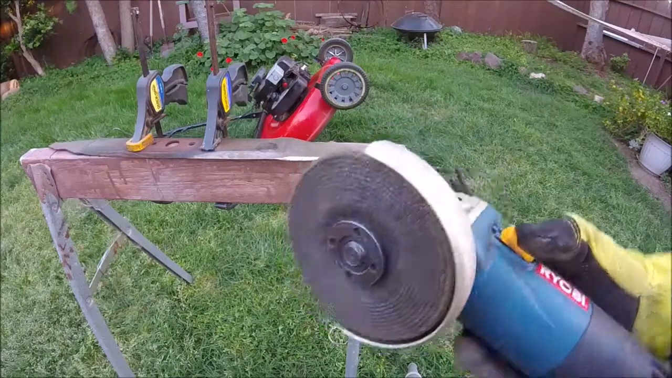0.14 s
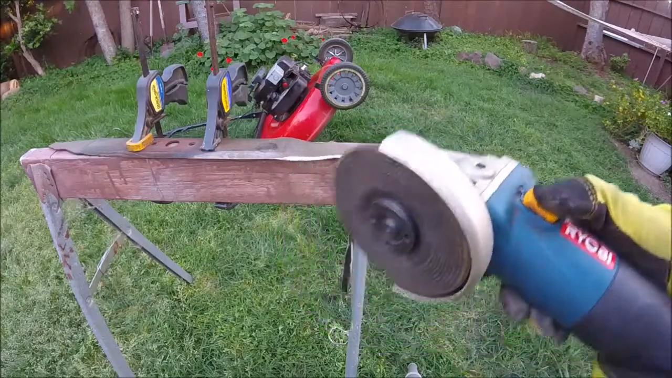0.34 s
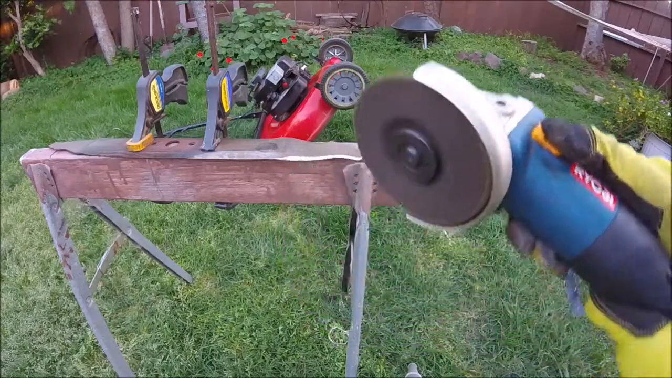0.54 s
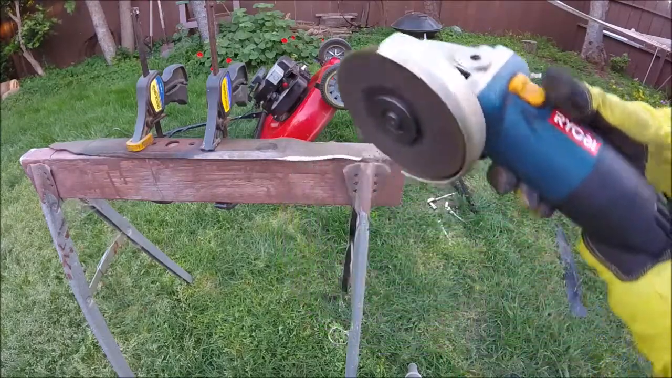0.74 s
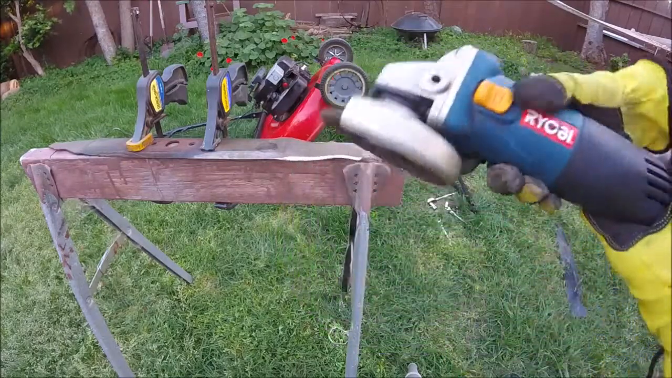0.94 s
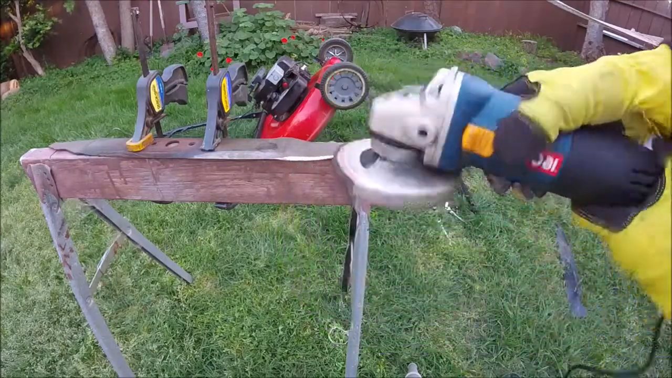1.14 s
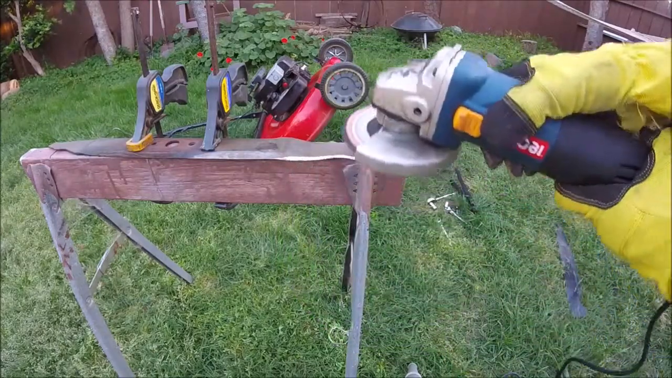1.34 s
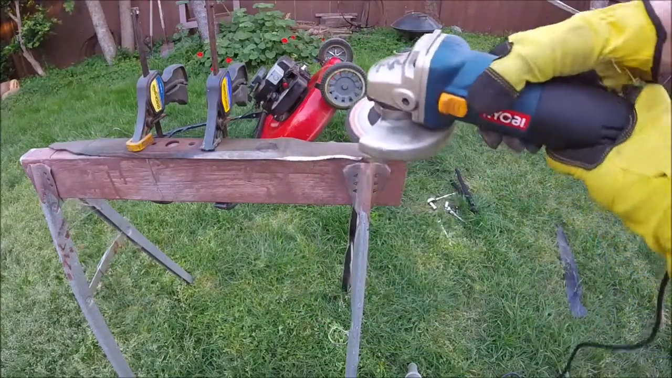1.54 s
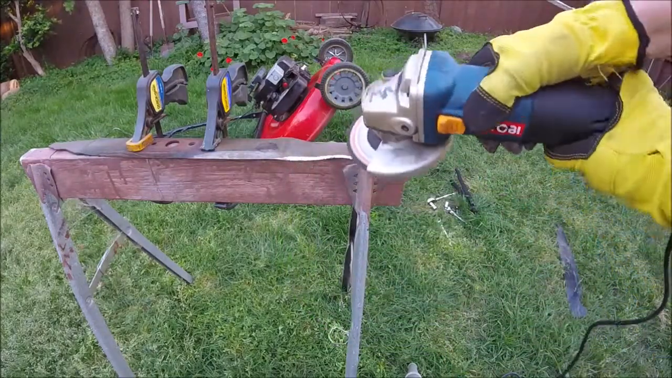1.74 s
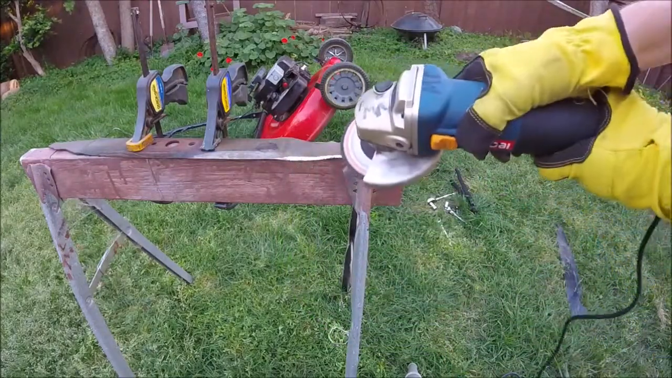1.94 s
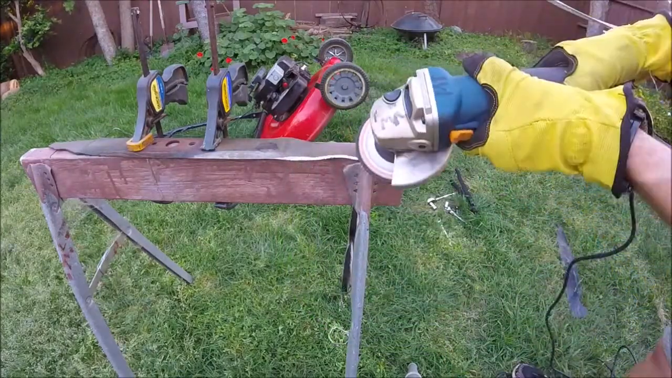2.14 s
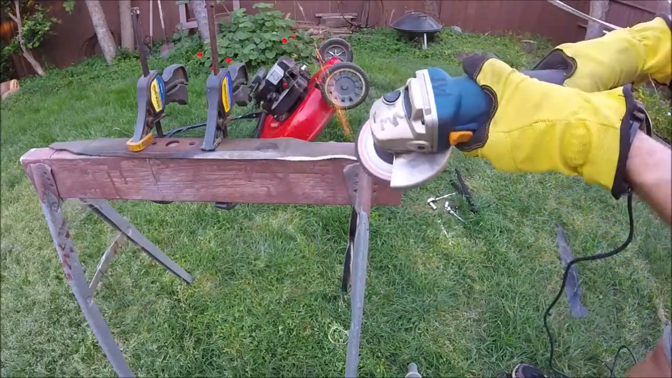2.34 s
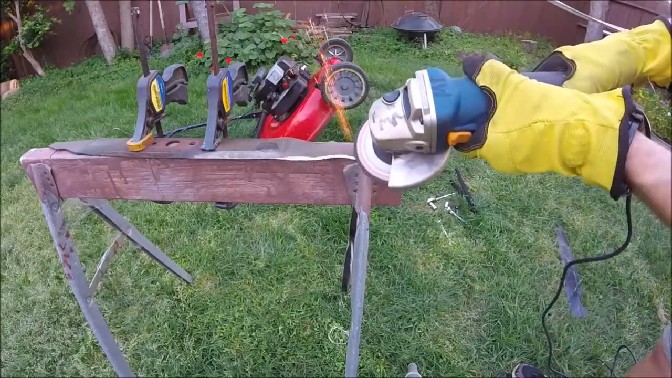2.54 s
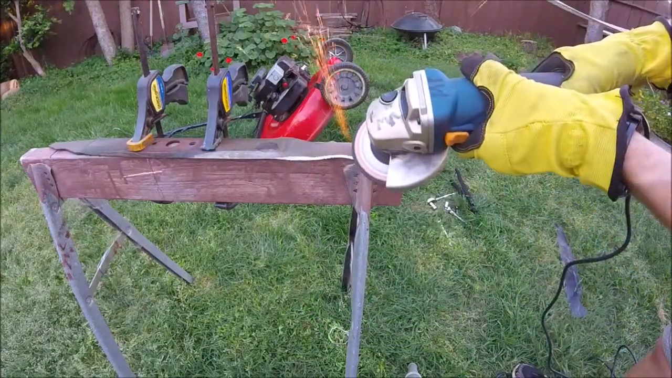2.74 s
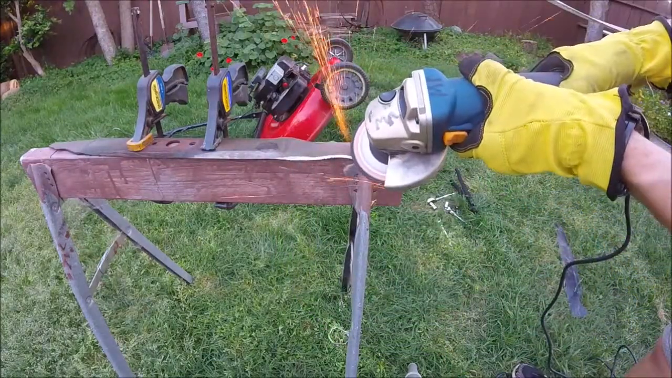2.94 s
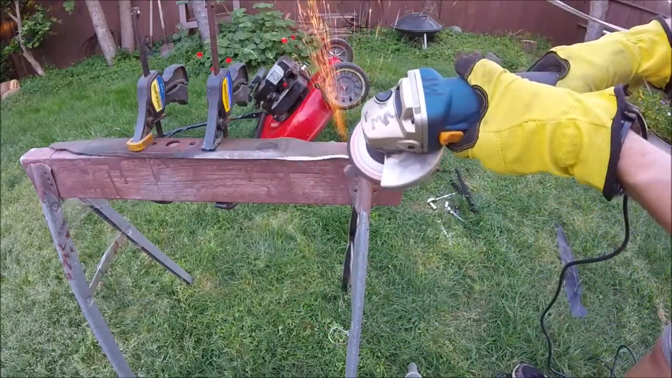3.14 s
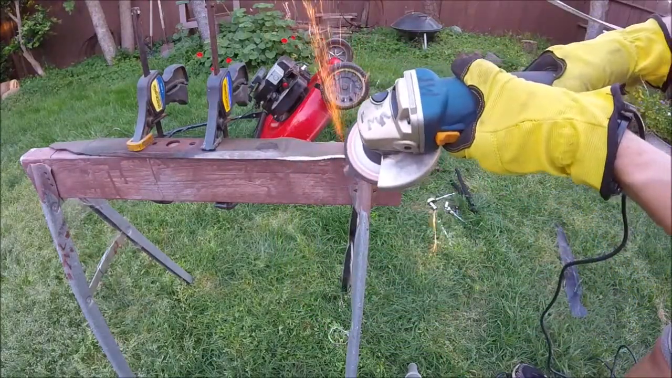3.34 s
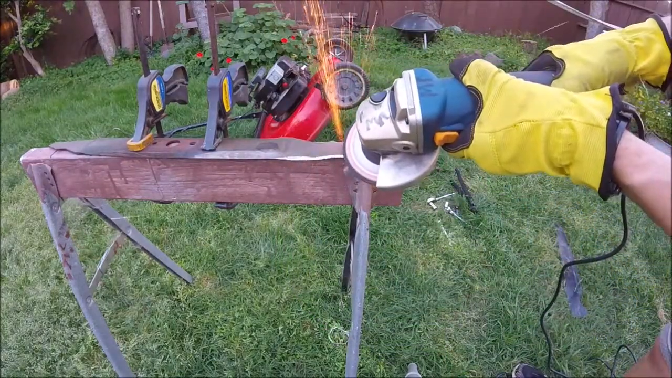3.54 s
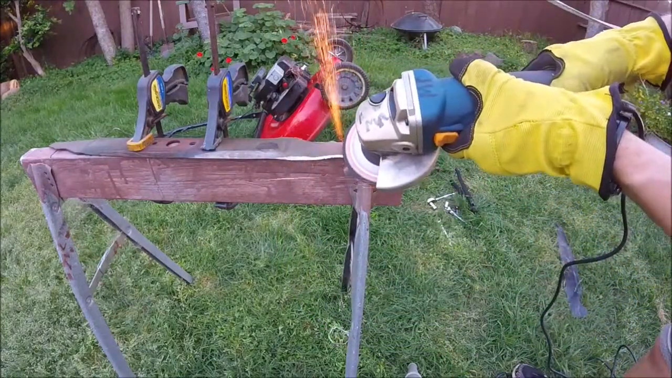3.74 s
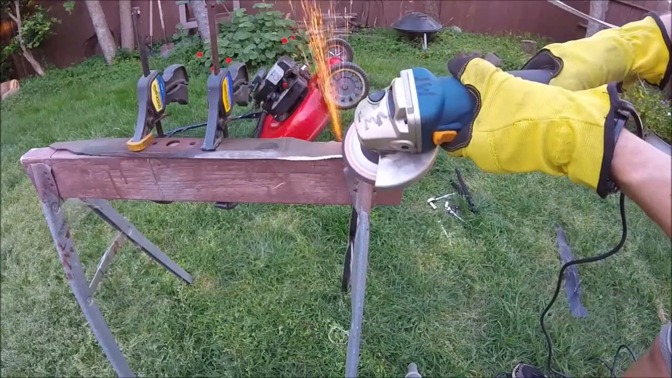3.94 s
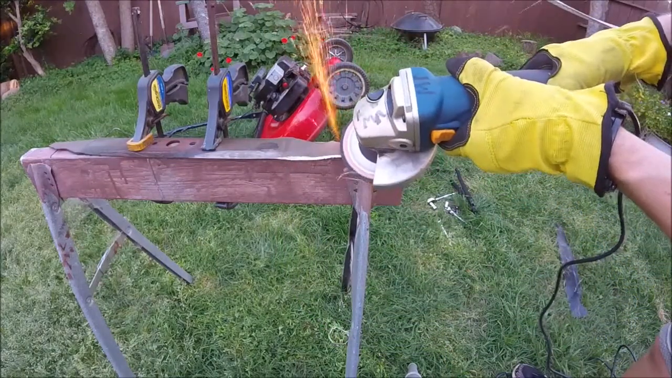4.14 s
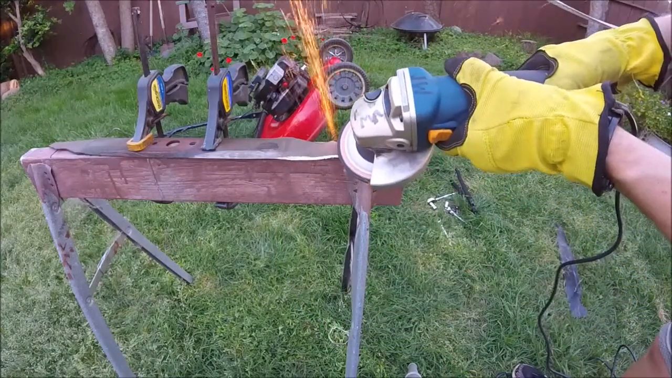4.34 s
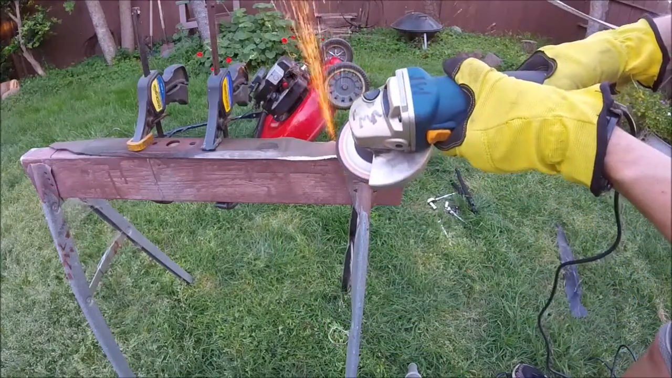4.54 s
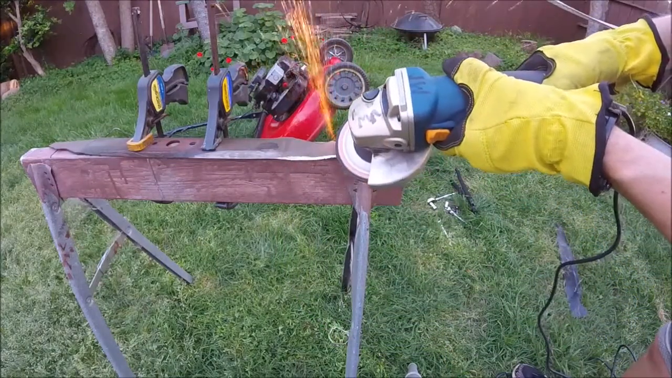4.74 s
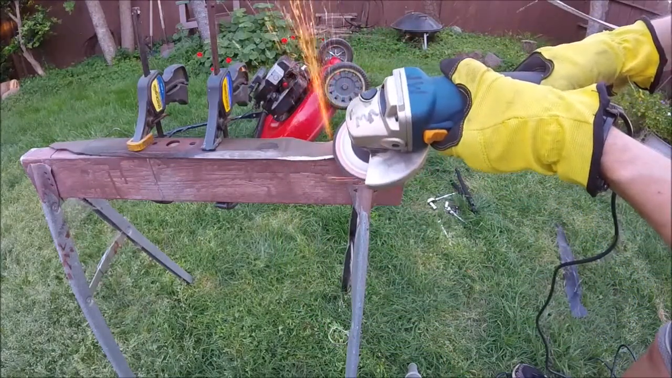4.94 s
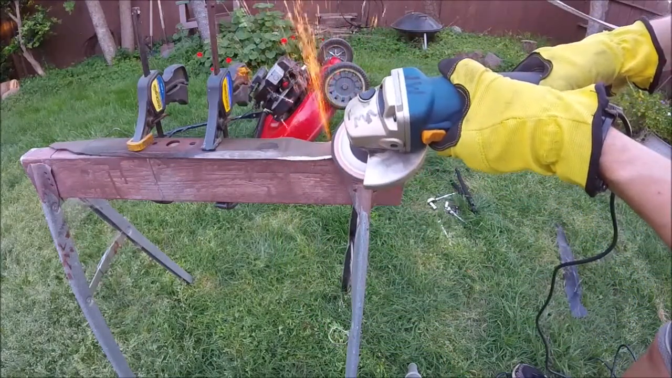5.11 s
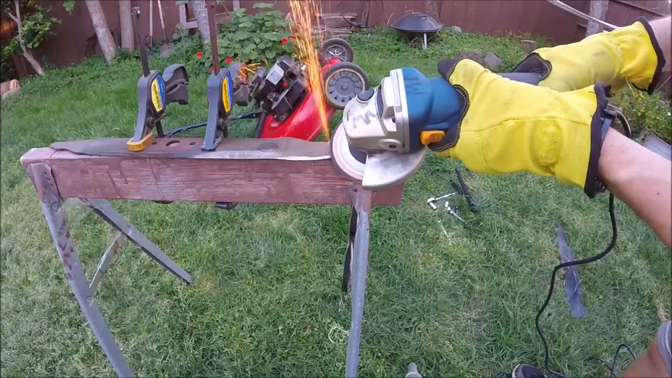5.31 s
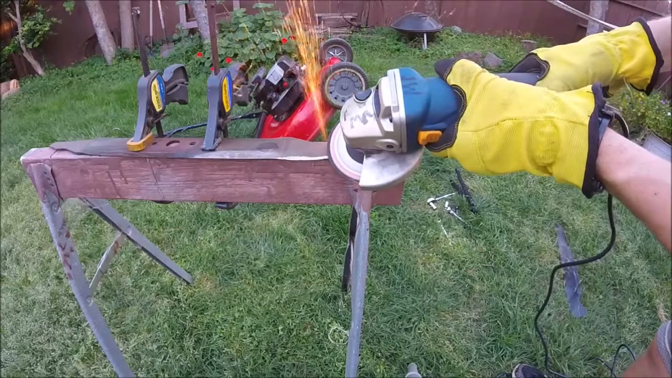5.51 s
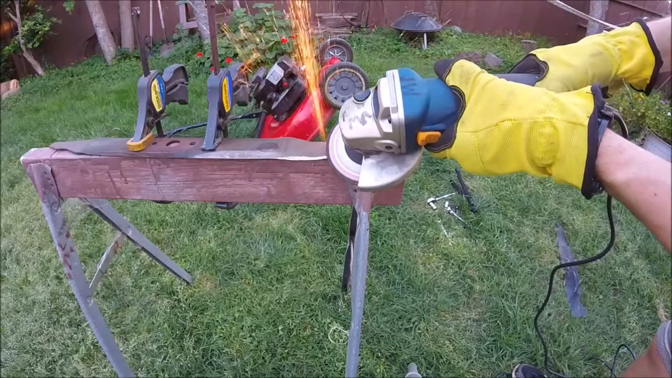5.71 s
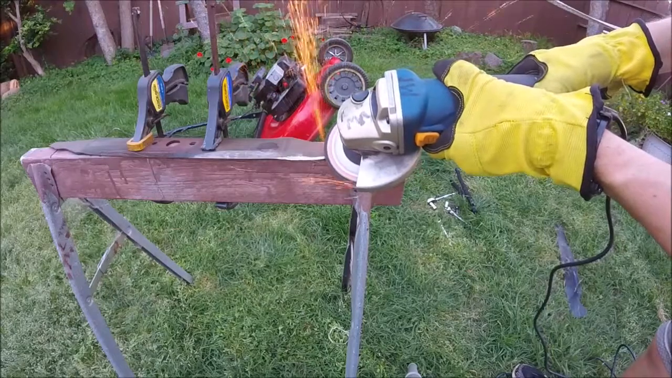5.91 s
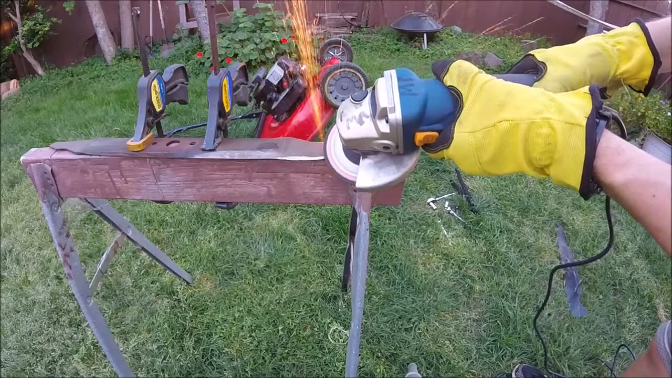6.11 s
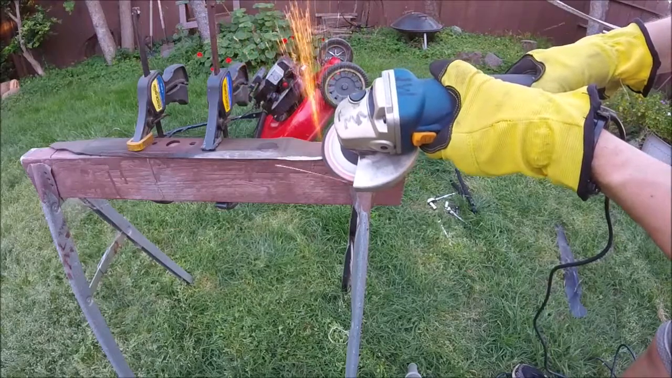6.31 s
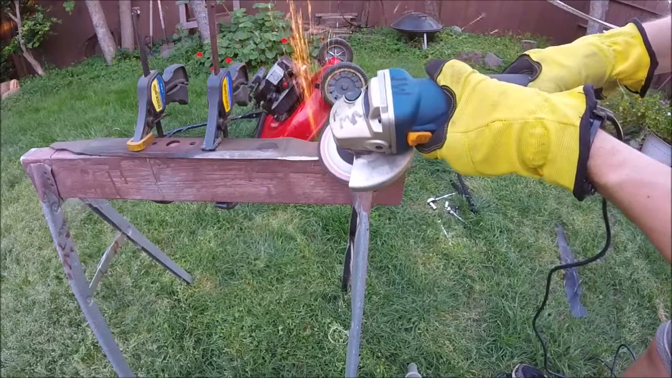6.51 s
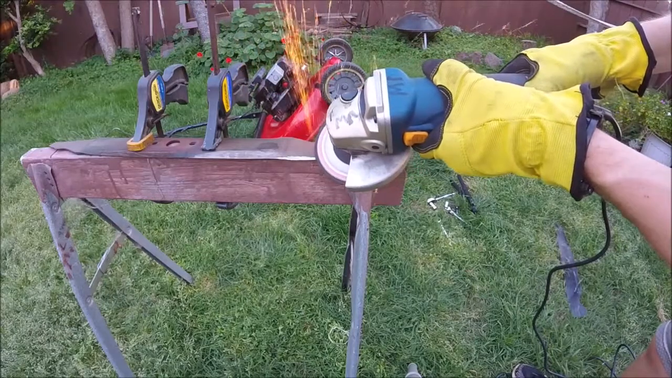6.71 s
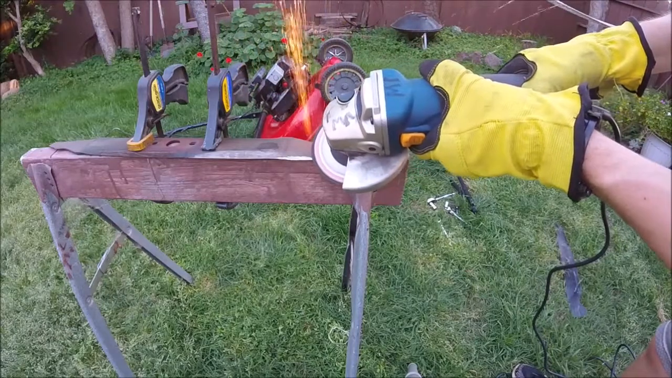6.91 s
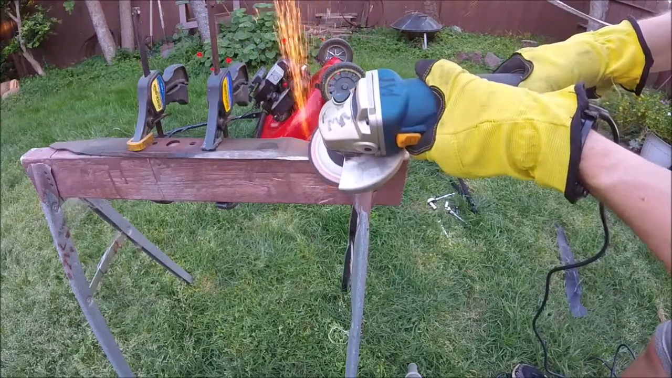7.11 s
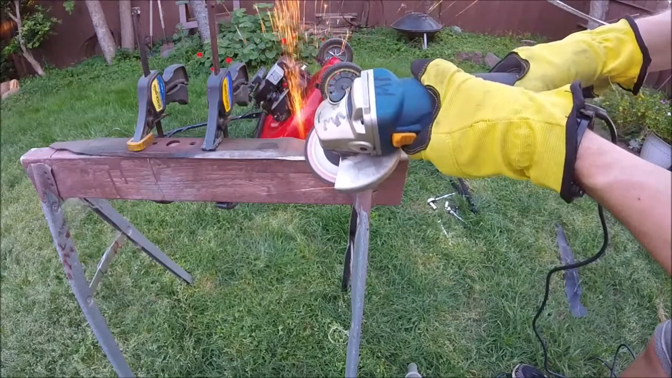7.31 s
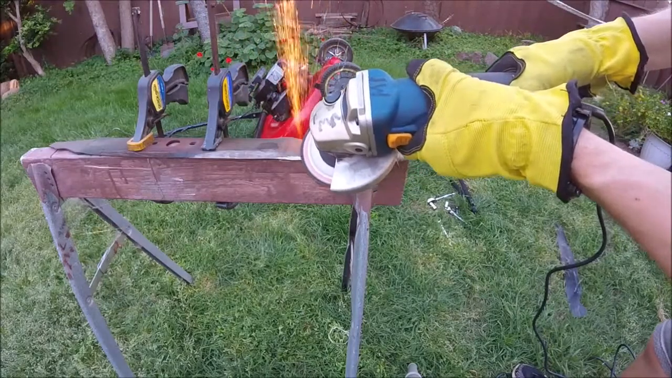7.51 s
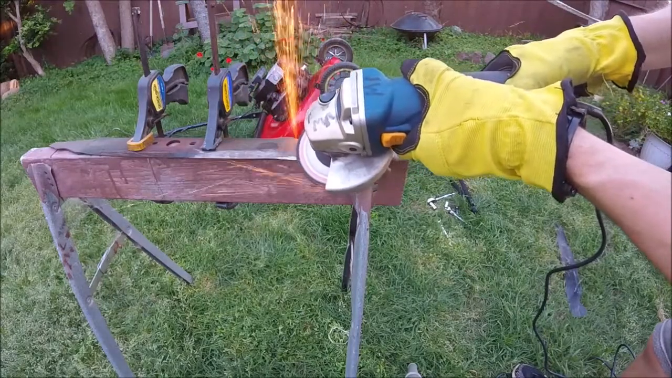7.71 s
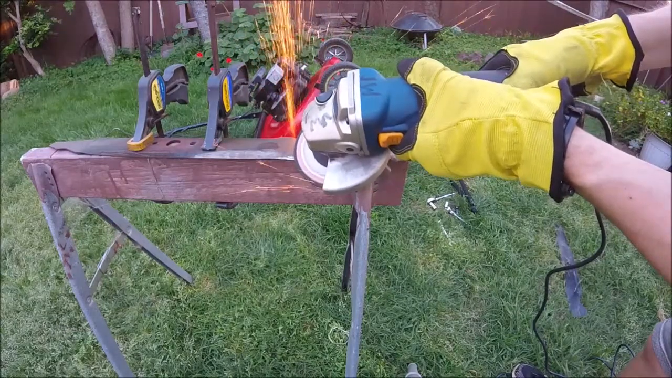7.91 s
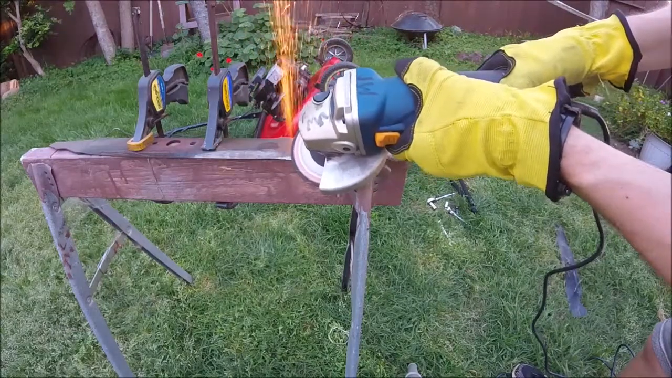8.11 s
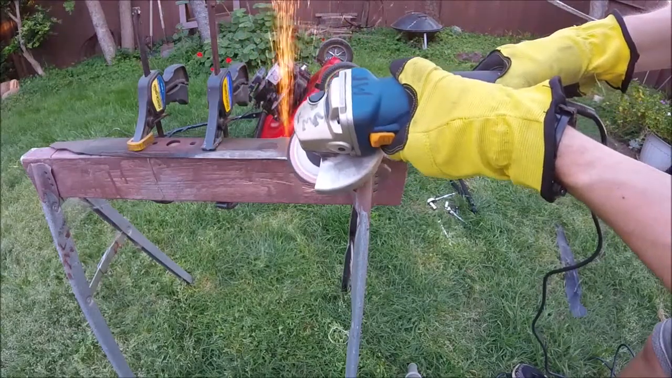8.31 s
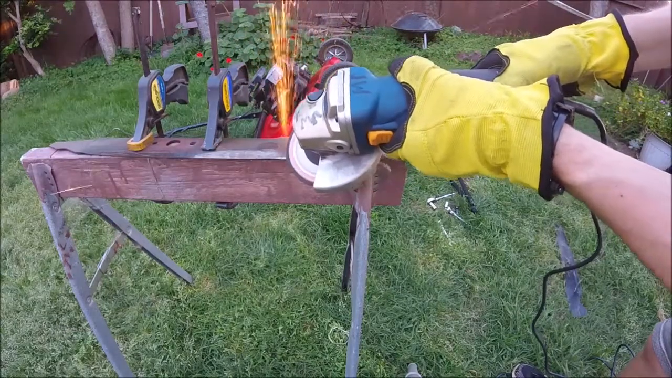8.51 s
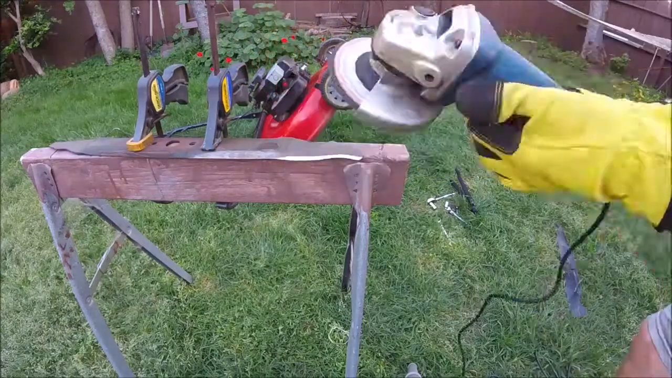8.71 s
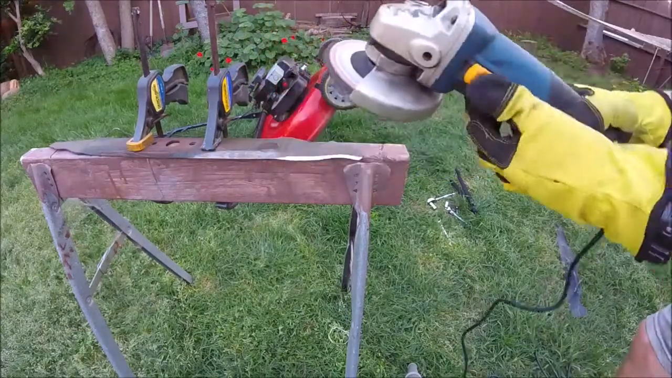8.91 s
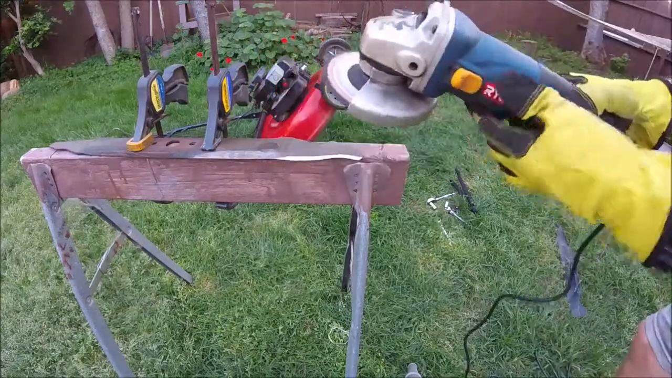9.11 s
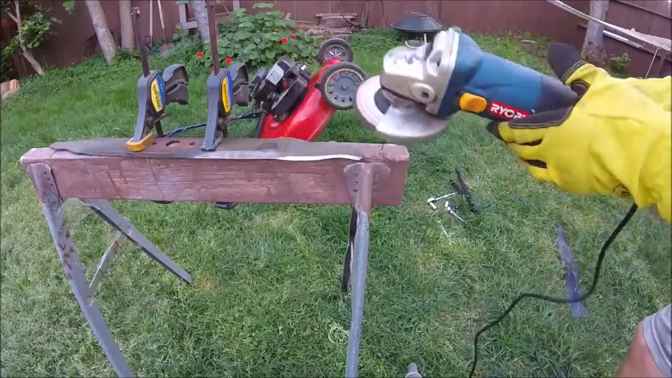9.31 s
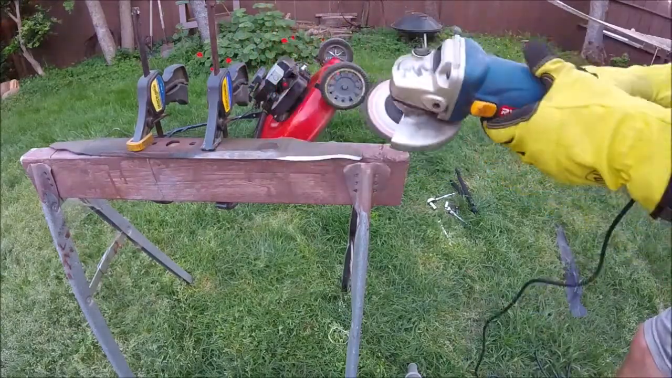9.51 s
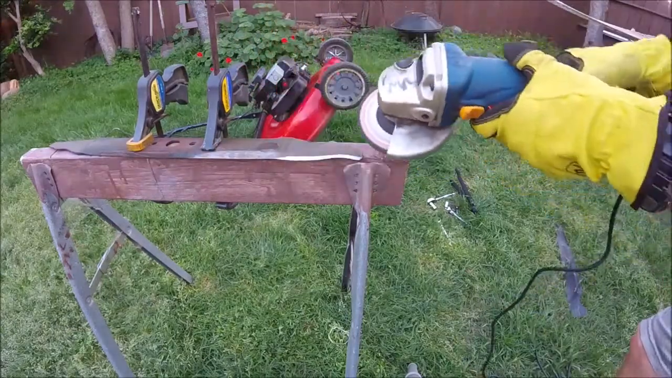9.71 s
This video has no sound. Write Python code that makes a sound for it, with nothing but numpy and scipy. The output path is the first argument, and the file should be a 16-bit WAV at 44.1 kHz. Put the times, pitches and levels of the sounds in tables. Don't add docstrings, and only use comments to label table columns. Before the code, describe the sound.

In a quiet yard with faint wind, chirps and distant wash, an angle grinder knocks on and whines up close to a small camera microphone. After a tiny gap its disc bites a steel blade, giving a harsh, fluttering grind, gritty hiss and metallic ringing. Another tiny gap, then it runs free and its pitch sinks as it coasts down.

```python
import sys
import numpy as np
from scipy import signal
from scipy.fft import irfft
from scipy.io import wavfile
from scipy.ndimage import uniform_filter1d, map_coordinates

SR = 44100
rng = np.random.default_rng(int(sys.argv[2]) if len(sys.argv) > 2 else 0)


def magnitude_from_level(level_db):
    exponent = np.asarray(level_db, float) / 20
    return 10 ** exponent


def store_pcm(level_fs):
    pcm = np.round(np.clip(level_fs, -1, 1) * 32767).astype(np.int16)
    wavfile.write(sys.argv[1], SR, np.atleast_2d(pcm).T)


N = 429975
T = np.arange(N) / SR
GEAR = 12 / 35
ON_S, OFF_S = .495, 8.99
FREE_HZ, IDLE_HZ = 529, 525

# start_s, hiss_db (pressure on the grit), depth_db (hand chatter)
PRESSURE = [(.49, -46, -12), (1.4, -39.5, -14), (2.14, -41, 12), (2.24, -38, 0), (2.3, -26.5, -1),
            (2.37, -36, 1), (2.5, -28, 2.5), (2.8, -28, 0.5), (4.0, -31.5, 1.5), (4.64, -30.5, 1.5),
            (5.6, -27.5, 1.5), (6.2, -33, 5), (7.5, -31.5, 6), (8.33, -29.5, 4), (8.77, -30, 4),
            (8.8, -36.5, 6), (9.2, -42.5, 14), (9.75, -47, 11)]
# pitch_hz, level_db
HOUSING = [(150, -24.5), (420, -12), (700, -1), (1040, 0.5), (1350, -6), (1800, -19.5), (2450, -6),
           (3150, -19), (3950, -13), (4700, -22.5), (6000, -12), (7200, -15), (8300, -25.5), (15000, -28)]
# start_s, speed_hz
LOADED_SPEED = [(2.166, 481), (2.53, 491.1), (2.85, 494.9), (3.35, 495), (4.15, 485.2), (4.8, 480.5),
                (6.1, 473.3), (6.9, 473.2), (7.4, 468.7), (8.05, 458.8), (8.77, 453)]
# start_s, end_s
SCENE_CHANGES = [
    (2.1490, 2.1823),
    (8.7572, 8.7905),
]

TOUCHING = (T > SCENE_CHANGES[0][0]) * (T < SCENE_CHANGES[1][1])


def evened(x):
    return x / np.sqrt(np.mean(x ** 2) + 1e-20)


def curves(rows):
    s, *columns = np.transpose(rows)
    return [np.interp(T, s, c) for c in columns]


def wander(hz):
    knots = rng.standard_normal(3000)
    return map_coordinates(knots, [T * 2 * hz], order=2)


def colour(x, points):
    f, db = np.transpose(points)
    hz = np.abs(np.fft.fftfreq(4096, 1 / SR))
    log_gain = np.log(magnitude_from_level(np.interp(np.log(hz + 1), np.log(f), db)))
    taps = np.fft.ifft(np.exp(log_gain - 1j * signal.hilbert(log_gain).imag)).real[:2048]
    return signal.oaconvolve(x, taps)[:len(x)]


def housed(x, points, lo_hz, hi_hz):
    y = colour(colour(x, points), HOUSING)
    band = signal.butter(4, [lo_hz, hi_hz], "band", fs=SR, output="sos")
    return y / np.std(signal.sosfilt(band, y))


def ringing(hz, width_hz):
    return evened(signal.lfilter(*signal.iirpeak(hz, hz / width_hz, SR), rng.standard_normal(N)))


def locked(rows, turns, waver_db):
    out = np.zeros(N)
    for multiple, start_s, end_s, db in rows:
        part = slice(max(round(start_s * SR), 0), round(end_s * SR))
        t = T[part]
        knots = rng.standard_normal((2, 200))
        waver, slip = (np.interp(t * 9.0, np.arange(200), v) for v in knots)
        fade = np.clip(np.minimum(t - start_s, end_s - t) / 0.16, 0, 1)
        phase = 2 * np.pi * round(multiple) * turns[part] + .5 * slip
        out[part] += magnitude_from_level(db + waver_db * waver) * fade * np.sin(phase)
    return out


def yard():
    # pitch_hz, level_db (per Hz)
    far_wash = [(110, -6.5), (160, -12), (480, -18.5), (970, -14.5), (1400, -32), (2300, -37),
                (5800, -43.5), (9000, -49), (15000, -56)]
    # pitch_hz, start_s, end_s, level_db
    chirps = [
        (4500, -.1, .25, -71),
        (5750, -.1, .15, -74),
        (2100, -.1, .3, -69),
        (3250, .3, .55, -67),
    ]
    # centre_s, half_length_s, rumble_db, buffet_db
    gusts = [
        (.3, 0.2, -37, -56),
        (1.9, 0.38, -40, -42),
        (2.7, 0.49, -38, -40.5),
        (3.7, 0.29, -40, -55),
        (4.4, 0.48, -38, -55),
        (5.5, 0.57, -39.5, -40.5),
        (6.8, 0.66, -46, -50),
        (8.815, 0.31, -40, -34),
        (9.7, .3, -52, -38),
    ]
    wash = magnitude_from_level(-43) * evened(colour(rng.standard_normal(N), far_wash)) + locked(chirps, T, 1.6)
    rumble = colour(rng.standard_normal(N), [(12, -24), (33, 2.5), (55, -7.5), (130, -40), (300, -59), (2000, -90)])
    buffets = colour(rng.standard_normal(N), [(40, -13), (75, 2.5), (130, -12.5), (300, -26), (2000, -86)])
    low, high = magnitude_from_level(-44.5), magnitude_from_level(-59)
    for s, half, rumble_db, buffet_db in gusts:
        swell = np.exp(-((T - s) / half) ** 2)
        low = low + magnitude_from_level(rumble_db) * swell
        high = high + magnitude_from_level(buffet_db) * swell
    return wash + magnitude_from_level(2 * wander(2.2)) * (low * evened(rumble) + high * evened(buffets))


def knocks():
    # start_s, peak_db
    lash_blows = [(0.499, 4.5), (0.511, 0), (0.514, 1), (0.522, 5), (0.537, -2), (0.547, -1), (0.553, 1),
                  (0.569, 1.5), (0.578, -4), (0.589, -2), (0.603, -18), (0.613, -12), (0.62, -18),
                  (0.629, -8), (0.637, -6), (0.65, -30), (0.659, -7), (0.673, -17), (0.685, -8)]
    case_hz, case_width_hz, case_db = 1063, 51, 4
    drive = np.zeros(N)
    for s, db in lash_blows:
        at = round(s * SR)
        drive[at:at + 600] += magnitude_from_level(db) * np.exp(-T[:600] / 0.0026) * rng.standard_normal(600)
        drive[at:at + 8] -= magnitude_from_level(db)
    case = signal.lfilter(*signal.iirpeak(case_hz, case_hz / case_width_hz, SR), drive)
    drive = drive + magnitude_from_level(case_db) * case
    return magnitude_from_level(3.5) * colour(colour(drive, [(300, 3), (2500, -1), (9000, -15)]), HOUSING)


def rings(bounce):
    # pitch_hz, width_hz, start_s, end_s, level_db, depth_db (of the bounce)
    passing = [
        (3640, 65, 4.2, 8, -37, 6),
        (3687, 145, 5.13, 7.4, -34, 7.5),
        (5580, 20, 3.9, 7.5, -32, 1),
        (1090, 34, 8.65, 9.2, -16, -8),
        (1164, 52, 8.8, 9.5, -20.5, 1),
        (1060, 88, 9.0, 10.2, -24.5, 0),
        (3910, 280, 0.54, 1.77, -31.5, -7),
        (3930, 200, 7.9, 9.9, -29.5, 5),
    ]
    out = np.zeros(N)
    for hz, width_hz, start_s, end_s, db, depth_db in passing:
        fade = np.clip(np.minimum(T - start_s, end_s - T) / 0.35, 0, 1)
        out += magnitude_from_level(db + depth_db * bounce) * fade * ringing(hz, width_hz)
    return out


def blade():
    # pitch_hz, width_hz, level_db
    rubbed = [
        (1046, 16, -19),
        (999, 41, -25),
        (2670, 58, -33.5),
        (4070, 46, -39),
    ]
    peak_s, rise_db_per_s, fade_db_per_s, most_fade_db = 3.9, 6, 4, 5
    out = np.zeros(N)
    for hz, width_hz, db in rubbed:
        out += magnitude_from_level(db) * ringing(hz, width_hz)
    fade_db = np.minimum(fade_db_per_s * (T - peak_s), most_fade_db)
    loss_db = np.where(T < peak_s, rise_db_per_s * (peak_s - T), fade_db)
    return out * magnitude_from_level(0.5 - loss_db) * TOUCHING


def rim(turns):
    orders = rng.standard_normal((40, 129, 3))
    spectra = magnitude_from_level(2.5 * orders[..., 2]) * (orders[..., 0] + 1j * orders[..., 1])
    shapes = irfft(spectra * (np.arange(129) > 6), 1024)
    shapes = np.concatenate([shapes, shapes[:, :1]], axis=1)
    return evened(map_coordinates(shapes, [T * 1.6, GEAR * turns % 1 * 1024], order=1))


def blend(share, repeating, random):
    share = np.clip(share, 0, 1) * (T > 2.25) * (T < 8.77)
    return np.sqrt(share) * repeating + np.sqrt(1 - share) * random


def grind(turns, bounce):
    # pitch_hz, level_db
    grit = [(300, -21), (1500, -5), (3000, -5), (6000, -5), (8500, 2), (10000, 3.5), (12000, 0.5),
            (15000, -0.5)]
    hiss_db, depth_db = curves(PRESSURE)
    bump = 1 + 0.5 * np.cos(2 * np.pi * GEAR * turns)
    scratch = blend(0.57, rim(turns), bump * rng.standard_normal(N))
    return magnitude_from_level(hiss_db) * housed(scratch * magnitude_from_level(depth_db * bounce), grit, 7770, 12830)


def high_orders():
    multiples = range(43, 89)
    start, length, size = rng.random((len(multiples), 3)).T
    start = 2.3 + 2.4 * start ** 2
    db = -49 - 0.19 * np.arange(len(size)) + 9.5 * (2 * size - 1)
    return list(zip(multiples, start, start + 1.3 + 1.5 * length, db))


def tones(turns, db, bite):
    # multiple, start_s, end_s, level_db
    motor_orders = [
        (2, 1, 1.77, -20),
        (3, 0.89, 1.24, -23),
        (2, 8.65, 9.12, -16.5),
        (3, 6.9, 9.1, -30),
        (3, 1.6, 3.9, -33),
        (13, 1.8, 3.5, -39),
    ]
    # multiple, start_s, end_s, level_db
    wheel_orders = [(1, 2.15, 9.2, -42), (2, 2.35, 8.9, -38), (6, 2.9, 4.3, -22), (6, 4.7, 8.1, -21.5),
                    (10, 4.75, 8.3, -31), (15, 3.91, 5.53, -30), (16, 4.68, 8.6, -29),
                    (20, 4.68, 7.01, -40), (22, 4.0, 6.42, -35), (23, 4.66, 7.03, -32),
                    (24, 2.61, 4.22, -34), (25, 4.87, 7.16, -33), (26, 4.49, 8.8, -36),
                    (30, 3.48, 5.29, -39), (31, 3.72, 6.22, -37), (35, 2.23, 4.6, -36), (1, .75, 1.45, -42),
                    (38, 2.32, 6.0, -34), (40, 3.34, 5.46, -35)]
    wheel_turns = GEAR * turns
    imbalance = magnitude_from_level(db) * np.sqrt(2) * np.sin(2 * np.pi * turns)
    singing = locked(wheel_orders[:2], wheel_turns, 4.5)
    singing = singing + locked([*wheel_orders[2:], *high_orders()], wheel_turns, 3.4)
    return imbalance + locked(motor_orders, turns, 2.1) + bite * singing


def speed():
    half_speed_s, coast_hz_per_s = .213, 122
    run = np.maximum(T - ON_S, 0)
    rising = FREE_HZ * run / (run + half_speed_s)
    coasting = IDLE_HZ - coast_hz_per_s * np.maximum(T - OFF_S, 0)
    spans = [T < LOADED_SPEED[0][0], T < LOADED_SPEED[-1][0]]
    return np.select(spans, [rising, curves(LOADED_SPEED)[0]], coasting)


def shaft():
    hz = speed()
    slow_db = 13 * (FREE_HZ / (hz + 1) - 1) ** 1.54
    loaded_db = 0.18 * (495 - hz)
    coast_db = 0.08 * (IDLE_HZ - hz) + 0.5
    sag_db = np.where(T < LOADED_SPEED[-1][0], loaded_db, coast_db)
    loss_db = np.where(T < LOADED_SPEED[0][0], slow_db, sag_db)
    return np.cumsum(hz) / SR, -22 - loss_db + 0.87 * wander(13.0)


def motor(turns):
    # start_s, level_db
    loudness = [(.49, -12), (.68, -24), (.97, -19), (1.5, -16), (2.14, -16), (2.3, -17.5), (2.85, -15.5),
                (3.7, -18.5), (4.4, -18), (5.9, -17), (6.25, -19), (7.0, -18), (8.0, -16.5), (8.75, -19),
                (8.8, -14.5), (9.1, -16.5), (9.3, -20.5), (9.75, -19)]
    # pitch_hz, level_db
    roar_colour = [(150, -0.5), (1000, -1), (2000, -6), (6000, -7.5), (15000, -63.5)]
    # pitch_hz, level_db
    rattle_colour = [(300, -17.5), (1200, -9), (2500, -3.5), (6000, -1.5), (9000, -17), (15000, -34)]
    teeth, vanes, mains_hz = 12, 13, 120
    surge_db, surge_s, lash_s = 7, 0.036, .23

    level_db = curves(loudness)[0]
    roar_db = level_db + surge_db * np.exp(-abs(T - ON_S) / surge_s) * (T > ON_S)
    rattle_db = level_db - 8.5 + 2.5 * TOUCHING
    mesh_db = -33.5 - 9 * (T > SCENE_CHANGES[0][0]) + np.maximum(T - OFF_S, 0)

    throb = 1 + 0.14 * np.cos(2 * np.pi * mains_hz * T) * (T < 9.0)
    roar = housed(rng.standard_normal(N) * throb * magnitude_from_level(1.2 * wander(40.0)), roar_colour, 350, 3100)

    hits = magnitude_from_level(4.0 * np.minimum(rng.exponential(1, N), 5)) * (rng.random(N) < 900 * throb / SR)
    clatter = signal.oaconvolve(evened(hits), np.exp(-T[:400] / 0.00021))[:N]
    rattle = (0.69 + evened(clatter)) * rng.standard_normal(N)

    slow = evened(signal.lfilter([1], np.poly([.978, .978]), rattle))
    early = np.exp(-(np.maximum(T - ON_S, 0) / lash_s) ** 4)
    tooth_whine = (0.34 + early) * np.cos(2 * np.pi * teeth * turns)
    blade_whine = (1 - early) * np.cos(2 * np.pi * vanes * turns)
    mesh = housed(slow * (tooth_whine + blade_whine),
                  [(2600, -12), (3100, 3), (4000, -9), (4600, -4), (5300, -6), (9000, 1.5)], 1800, 5700)

    rattle = blend(0.057, rim(turns), evened(rattle))
    rattle = housed(rattle, rattle_colour, 1960, 6000)
    return magnitude_from_level(roar_db) * roar + magnitude_from_level(rattle_db - 3.5) * rattle + magnitude_from_level(mesh_db) * mesh


def scene():
    turns, shaft_db = shaft()
    beat = 2 * np.pi * np.cumsum(52 + 3.0 * wander(3.0)) / SR
    bounce = np.sin(beat) + 0.56 * np.sin(2 * beat) + 0.32 * wander(25.0)
    grinding = (T > SCENE_CHANGES[0][1]) & (T < SCENE_CHANGES[1][0])
    bounce *= np.where(grinding, 1, .3)
    bite = magnitude_from_level(0.27 * curves(PRESSURE)[1] * bounce)
    engaged = np.clip((T - .48) / 0.15, 0, 1)
    tool = bite * (engaged * motor(turns) + blade()) + engaged * grind(turns, bounce)
    return (tool + tones(turns, shaft_db, bite) + knocks() + rings(bounce) + yard())[None]


def camera(x):
    # centre_s, reach_db (under the loudest band that still survives)
    lean = [(.151, 36), (1.062, 23), (1.445, 23), (1.492, 23), (1.643, 23), (1.707, 23), (1.834, 24),
            (1.927, 15), (2.345, 21), (2.624, 21), (3.878, 21), (4.029, 21), (4.075, 21), (4.209, 13),
            (4.284, 21), (4.778, 21), (6.699, 21), (8.916, 24), (9.085, 25), (9.213, 25), (9.387, 24)]
    # pitch_hz, weight (each 1 takes 8 dB off the margin that spares a band)
    empty = [(4300, 0), (4700, .06), (5100, 0), (7600, .03), (8200, .5), (8700, .12), (9450, .7),
             (9900, .12), (10900, .45), (11600, .2), (12400, .45), (13600, .35), (14600, .55), (15000, .4)]
    hz, t, z = signal.stft(x[0], SR, nperseg=1024, noverlap=768)
    treble = hz[:, None] > 7400
    band = np.arange(len(hz)) // 4
    chance = rng.standard_normal((band[-1] + 1, len(t)))
    chance = evened(uniform_filter1d(chance, size=45, axis=1)[band])

    power = abs(z) ** 2
    fine = uniform_filter1d(uniform_filter1d(power, size=4, axis=0), size=5, axis=1) + 1e-20
    under_db = 10 * np.log10(fine / uniform_filter1d(fine, size=31, axis=0))
    spared_db = 10.5 - 8 * np.interp(hz, *np.transpose(empty))[:, None] + 1.8 * chance - 5 * treble
    keep = np.clip(under_db + spared_db + (hz[:, None] < 4200) * 99, 0, 1)
    keep *= magnitude_from_level(1.8 * chance * treble)

    level_db = 10 * np.log10(uniform_filter1d(power, size=3, axis=0) + 1e-20)
    reach_db = np.full(len(t), 200.)
    for s, db in lean:
        reach_db[abs(t - s) < .012] = db + 2
    keep *= np.clip((level_db - level_db[5:].max(0) + 18.0 * treble + reach_db) / 6, .05, 1)
    keep *= np.clip((15100 - hz[:, None]) / 200, 0, 1)
    return signal.istft(z * keep, SR, nperseg=1024, noverlap=768)[1][None, :N]


def top_cut(x):
    return signal.sosfilt(signal.butter(12, 16370, fs=SR, output="sos"), x)


def record(dry):
    kept = camera(np.tanh(dry / 1.385) * 1.208)
    for start_s, end_s in SCENE_CHANGES:
        kept = kept * ((T < start_s) | (T > end_s))
    return top_cut(kept)


dry = scene()
out = record(dry)
store_pcm(out)
```